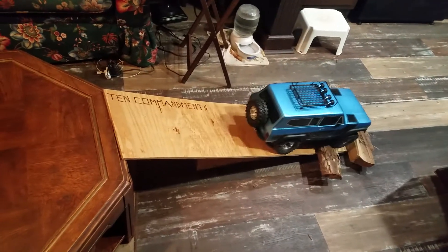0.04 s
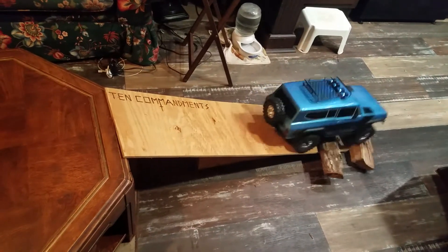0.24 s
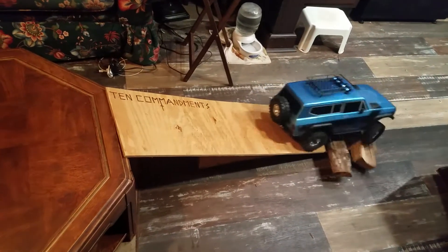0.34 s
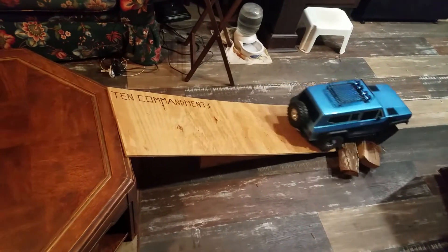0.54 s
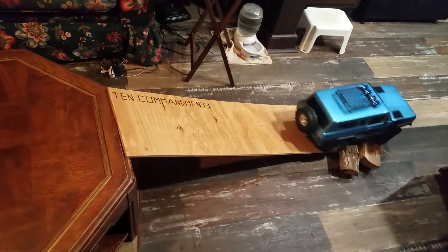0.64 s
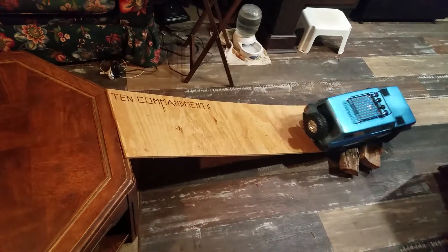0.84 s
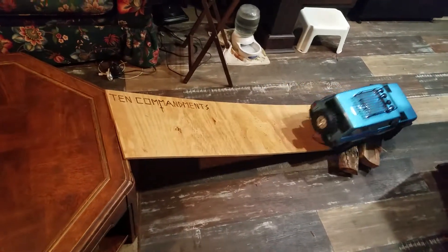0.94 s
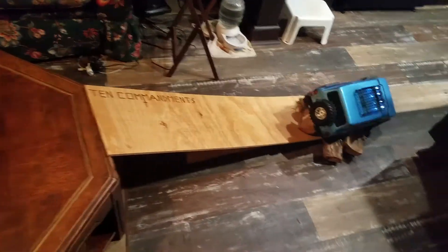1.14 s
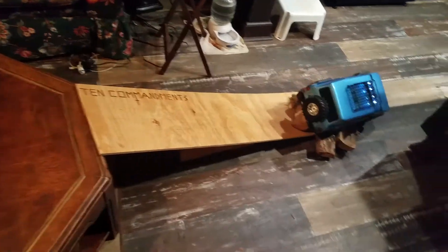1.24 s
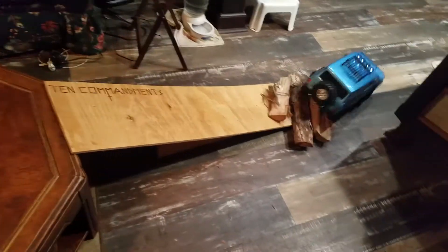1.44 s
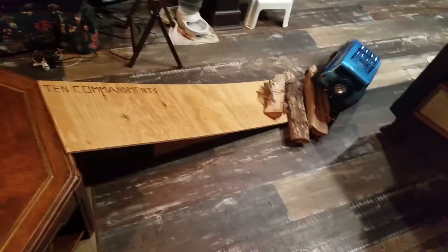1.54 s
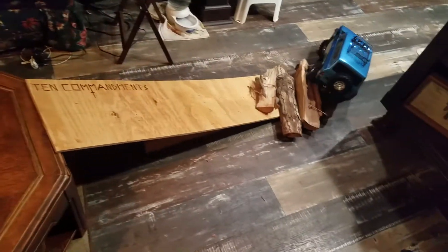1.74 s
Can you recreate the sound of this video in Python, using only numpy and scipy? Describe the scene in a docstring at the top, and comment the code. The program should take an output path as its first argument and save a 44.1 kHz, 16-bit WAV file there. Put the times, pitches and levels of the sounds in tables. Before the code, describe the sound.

Close by in a room, a toy truck's geared motor whirs as its tires land on wood with hollow thumps. It eases off, squeaks twice, then revs again amid more knocks and plastic rattles.

```python
"""A geared motor rasps and whines in bursts of throttle over the rumble of tires on wood: a small
remote-controlled truck crawling off a plywood ramp and over split logs, on a living room floor.
Landing tires boom and ring the wood, the chassis knocks on a log, the plastic shell clacks and
rattles, and two brief squeaks slip out. The stereo microphone is near the truck, with the treble
a little to the left; the room answers every blow with a short tail."""
import sys
import numpy as np
from scipy import signal
from scipy.fft import rfft, irfft, next_fast_len
from scipy.io import wavfile
from scipy.ndimage import map_coordinates

SR = 44100
rng = np.random.default_rng(int(sys.argv[2]) if len(sys.argv) > 2 else 0)


def transcribe(signal):
    """Save signal, clipped to [-1, 1], as a 16-bit WAV file at the path in sys.argv[1]."""
    frames = np.atleast_2d(signal).T
    limited = np.clip(frames, -1, 1)
    pcm = np.round(limited * 32767).astype(np.int16)
    wavfile.write(sys.argv[1], SR, pcm)


N = 79380

# gear rasp following the throttle: time_s, level_db
THROTTLE = [(0, -45.5), (.03, -37.5), (.26, -35.5), (.5, -35), (.6, -50), (.695, -54), (.755, -33.5),
            (.79, -32), (.92, -54), (1.0, -42.5), (1.07, -45), (1.158, -57), (1.215, -33), (1.31, -28.5),
            (1.45, -36.5), (1.6, -44.5), (1.66, -42), (1.8, -39)]
# gear mesh following motor speed: time_s, pitch_hz
MESH_PITCH = [(0, 3700), (.09, 4300), (.22, 4950), (.45, 4950), (.53, 4400), (.67, 800), (.92, 1400),
              (.99, 2700), (1.04, 2950), (1.075, 2450), (1.16, 2350), (1.205, 4150), (1.275, 5500),
              (1.31, 5400), (1.34, 4650), (1.5, 3400)]
# gear whine, strongest as the motor revs: time_s, level_db
WHINE_LEVEL = [(0, -46), (.14, -43), (.5, -46.5), (.92, -72), (1.0, -42.5), (1.1, -48), (1.17, -61),
               (1.23, -32), (1.34, -35.5), (1.4, -53)]
# tones of the gear stages: cycles_per_motor_turn, level_db
GEAR_ORDERS = [(9.6, -6), (14, 0), (21, -5)]
# spectrum of the gear rasp: frequency_hz, level_db
GEAR_SPECTRUM = [(100, -28), (420, 2.5), (1600, -3.5), (3300, -1.5), (4700, 0.5), (5800, -5.5), (7400, -2),
                 (8300, -5.5), (9200, -13.5), (15500, -40)]
# bright fizz of the gears and of the shell's snap: frequency_hz, level_db
FIZZ_SPECTRUM = [(1500, -58), (5000, 6), (9500, 2), (15000, 1.5)]
# tires rolling on wood: time_s, level_db
ROLL_LEVEL = [(0, -44.5), (.11, -38.5), (.14, -33.5), (.3, -25), (.44, -33), (.6, -40), (.7, -43),
              (.95, -43), (1.14, -52), (1.29, -34), (1.42, -27.5), (1.51, -29), (1.61, -38.5), (1.7, -31),
              (1.8, -38)]
# spectrum of tread on wood: frequency_hz, level_db
TREAD_SPECTRUM = [(20, -70), (50, -4.5), (180, -1.5), (300, -4), (400, -3), (500, -9.5), (700, -10.5),
                  (1400, -12.5), (2200, -17), (5000, -35)]
# tires landing: start_s, level_db, pitch_hz
LANDINGS = [(0.129, -19.5, 202), (0.199, -21, 170), (0.251, -17, 181), (.312, -10, 232), (.323, -2, 211),
            (.345, -8, 284.4), (0.37, -13.5, 252), (.397, -34, 204), (0.429, -16, 163), (.488, -17.5, 190),
            (0.807, -20, 312), (0.822, -18, 187), (0.832, -15, 420), (1.309, -15, 226), (1.318, -12.5, 167),
            (1.332, -15.5, 422), (1.348, -18, 258), (1.378, -11.5, 424), (1.693, -25.5, 414)]
# modes of the ramp and logs: pitch_hz, level_db, t60_s
WOOD_MODES = [(83.3, 3, 0.39), (151, 3, 0.253), (180.5, -2.5, 0.18), (253.5, -2, 0.15), (357, -1, 0.2),
              (422.3, -4.5, 0.1), (579, -1.5, 0.31)]
# chassis striking a log: start_s, level_db
CHASSIS_HITS = [(.262, -24.5), (.312, -19.5), (1.378, -25)]
# modes rung by the chassis: pitch_hz, level_db, t60_s
CHASSIS_HIT_MODES = [(937, -10, 0.085), (1298, -3.5, 0.14), (1370, -13, 0.023)]
# blows to the plastic shell: start_s, level_db, tilt_db_per_octave
SHELL_HITS = [(.135, -28.5, -2), (.526, -25.5, -6.5), (.622, -33.5, -5), (0.82, -23, 0), (1.33, -22, -4),
              (1.529, -24, 0), (1.627, -35, 3), (1.639, -27.5, -3), (1.758, -27.5, -5.5)]
# spectrum of the shell: frequency_hz, level_db
SHELL_SPECTRUM = [(100, -26), (400, 1), (950, -0.5), (1350, 2), (1900, -4), (2350, 0.5), (3500, -6.5),
                  (5000, -14), (15000, -36)]
# gears and tires squeaking under load: centre_s, length_s, pitch_hz, glide_octaves_per_s, level_db
LOAD_SQUEAKS = [(.728, .04, 1070, 9, -41), (.772, .035, 6080, .3, -34.5)]
# room tone: frequency_hz, level_db
ROOM_TONE_SPECTRUM = [(20, 6), (60, 9.5), (400, -17.5), (15000, -34)]
# reverberation of the living room: frequency_hz, t60_s
ROOM_DECAY = [(100, 0.19), (500, 0.42), (3000, 0.34), (12000, 0.099)]
# likeness of left and right at the microphone: frequency_hz, correlation
MIC_CORRELATION = [(60, 1), (250, 0.96), (500, 0.82), (1000, 0.64), (2000, -0.13)]
# balance at the microphone: frequency_hz, left_minus_right_db
MIC_BALANCE = [(50, -2.5), (400, -0.6), (2200, 1), (5000, 2), (7500, 6.5), (11000, -1.5)]

CRUISE_DB, PINION_TEETH = -39, 14  # effort is counted from the mid-throttle level
RASP_DB, FIZZ_DB, FIZZ_DB_PER_EFFORT_DB, FIZZ_DB_PER_OCTAVE = 1.5, -3.5, 1.32, 3
THUMP_RISE_S, RING_DB, RING_FALL_DB_PER_OCTAVE = 0.0035, -11.5, 8.5
CLACK_T60_S, RATTLE_T60_S, RATTLE_DB, SNAP_DB = 0.066, 0.25, -11, -12
LOW_CUT_HZ, TOP_HZ = 37, 15870


def drivetrain():
    """Gear teeth rasp once a motor turn and each gear stage whines; more throttle is brighter."""
    effort_db = curve(THROTTLE) - CRUISE_DB
    turn_hz = curve(MESH_PITCH) / PINION_TEETH
    phase = 2 * np.pi * np.cumsum(turn_hz * (1 + 0.012 * wobble(60))) / SR
    teeth = amp(0.8 * np.sin(phase) + wobble(900))
    rasp = amp(RASP_DB + effort_db) * noise(GEAR_SPECTRUM, teeth)
    speed_db = FIZZ_DB_PER_OCTAVE * np.log2(turn_hz / turn_hz.mean())
    fizz = amp(FIZZ_DB + FIZZ_DB_PER_EFFORT_DB * effort_db + speed_db) * noise(FIZZ_SPECTRUM, teeth)
    partials = np.zeros(N)
    for order, db in GEAR_ORDERS:
        swell_db = 4.5 * wobble(45)
        gain = amp(db + along(GEAR_SPECTRUM, order * turn_hz) + swell_db)
        partials += gain * np.sin(order * phase + 0.65 * wobble(500))
    whine = amp(curve(WHINE_LEVEL)) * unit(in_room(unit(partials), wet_db=1))
    return amp(CRUISE_DB) * (rasp + fizz) + whine


def rolling_tires():
    """Tread blocks patter unevenly over the wood."""
    patter = amp(1.68 * wobble(110))
    return amp(2 + curve(ROLL_LEVEL)) * noise(TREAD_SPECTRUM, patter)


def tire_thumps():
    """Each landing is a short hollow boom that rings the wood, most in the modes near its own pitch."""
    out, t = np.zeros((2, N)), np.arange(SR // 2) / SR
    rise = t / THUMP_RISE_S
    for start_s, db, pitch_hz in LANDINGS:
        boom = np.sin(2 * np.pi * pitch_hz * t) * rise * np.exp(1 - rise)
        ring = np.zeros(len(t))
        for hz, mode_db, t60_s in WOOD_MODES:
            octaves_off = abs(np.log2(hz / pitch_hz))
            gain = amp(mode_db + rng.normal(0, 2.04) - RING_FALL_DB_PER_OCTAVE * octaves_off)
            ring += gain * np.sin(2 * np.pi * (hz * t + rng.random())) * fade(t, t60_s)
        thump = boom + amp(RING_DB) * ring * (1 - np.exp(-rise))
        add(out, start_s, amp(db) * in_room(thump, wet_db=-4.5))
    return out


def chassis_knocks():
    """The chassis hits a log: a sharp crack and a short woody ring."""
    out, t = np.zeros((2, N)), np.arange(SR // 2) / SR
    for start_s, db in CHASSIS_HITS:
        ring = sum(amp(mode_db) * np.sin(2 * np.pi * hz * t) * fade(t, t60_s)
                   for hz, mode_db, t60_s in CHASSIS_HIT_MODES)
        crack = amp(1) * noise(TREAD_SPECTRUM)[:, :len(t)] * fade(t, t60_s=0.016)
        add(out, start_s, amp(db) * in_room(ring + crack, wet_db=-4.5))
    return out


def shell_clacks():
    """The thin body shell snaps sharply, then chatters on its posts."""
    out, t = np.zeros((2, N)), np.arange(SR // 2) / SR
    strike = fade(t, CLACK_T60_S)
    for start_s, db, tilt in SHELL_HITS:
        colour = [(hz, level_db + tilt * np.log2(hz / 1300)) for hz, level_db in SHELL_SPECTRUM]
        chatter = amp(RATTLE_DB + 3.76 * wobble(264)[:len(t)]) * fade(t, RATTLE_T60_S)
        snap = amp(SNAP_DB + 4.2 * tilt) * noise(FIZZ_SPECTRUM)[:, :len(t)] * strike
        body = noise(colour)[:, :len(t)] * (strike + chatter)
        add(out, start_s, amp(db) * in_room(snap + body, wet_db=-1.5))
    return out


def squeaks():
    """Gears and tires under load give short, rough, rising chirps."""
    out = np.zeros(N)
    for centre_s, length_s, hz, glide, db in LOAD_SQUEAKS:
        t = np.arange(N) / SR - centre_s
        phase = 2 * np.pi * np.cumsum(hz * 2 ** (glide * t)) / SR
        swell = np.exp(-(2 * t / length_s) ** 2)
        out += amp(db + 0.5) * swell * np.sin(phase + 0.92 * wobble(hz / 8))
    return in_room(out, wet_db=1.5)


def in_room(x, wet_db):
    """The direct sound plus the living room's stereo tail, which dies fastest in the treble."""
    hz, t, bands = signal.stft(rng.standard_normal((2, SR // 2)), SR, nperseg=256)
    bands = bands * fade(t, along(ROOM_DECAY, hz)[:, None])
    tail = spread(signal.istft(bands, SR, nperseg=256)[1])
    wet = signal.fftconvolve(np.atleast_2d(x), tail / np.linalg.norm(tail[0]), axes=1)
    return x + amp(wet_db) * wet[:, :x.shape[-1]]


def room_tone():
    """The faint, steady rumble of the room behind the truck."""
    return amp(-48.5) * noise(ROOM_TONE_SPECTRUM)


def amp(db):
    """Decibels to gain."""
    return 10 ** (np.asarray(db) / 20)


def unit(x):
    """Scale to rms 1."""
    return x / np.sqrt(np.mean(x ** 2) + 1e-20)


def fade(t, t60_s):
    """A decay of 60 dB in t60_s seconds."""
    return amp(-60 * t / t60_s)


def along(rows, hz):
    """Read (frequency_hz, value) rows on a log axis."""
    row_hz, values = np.transpose(rows)
    return np.interp(np.log(hz + 1), np.log(row_hz + 1), values)


def curve(rows):
    """One value per sample from (time_s, value) rows."""
    return np.interp(np.arange(N) / SR, *np.transpose(rows))


def wobble(knots_per_s):
    """A smooth random curve."""
    return map_coordinates(rng.standard_normal(N // 8), [np.arange(N) * knots_per_s / SR], mode="wrap")


def filtered(x, response):
    """Filter x by response(hz), a gain at each frequency."""
    n = x.shape[-1]
    padded = next_fast_len(n + SR // 4)
    return irfft(rfft(x, padded) * response(np.fft.rfftfreq(padded, 1 / SR)), padded)[..., :n]


def spread(pair):
    """Two unrelated signals to left and right: alike in the bass, apart in the treble."""
    def mid_side_gains(hz):
        angle = np.arccos(np.clip(along(MIC_CORRELATION, hz), -1, 1)) / 2
        return np.array([np.cos(angle), np.sin(angle)])
    mid, side = filtered(pair, mid_side_gains)
    return np.array([mid + side, mid - side])


def noise(spectrum, grain=1):
    """Stereo noise of rms 1, roughened by grain and then coloured."""
    rough = grain * rng.standard_normal((2, N))
    return unit(spread(filtered(rough, lambda hz: amp(along(spectrum, hz)))))


def add(track, start_s, x):
    """Mix x into the track at start_s."""
    part = track[:, max(round(start_s * SR), 0):][:, :x.shape[-1]]
    part += x[:, :part.shape[1]]


def scene():
    """At the microphone: the truck over the room tone, the treble a little to the left."""
    truck = drivetrain() + squeaks() + rolling_tires() + tire_thumps() + chassis_knocks() + shell_clacks()
    return filtered(truck + room_tone(), lambda hz: amp(np.outer([.5, -.5], along(MIC_BALANCE, hz))))


def record(dry):
    """The recorder sheds the deep bass and keeps nothing above its band limit."""
    return filtered(dry, lambda hz: (hz < TOP_HZ) * (1 - np.exp(-(hz / LOW_CUT_HZ) ** 3)))


dry = scene()
out = record(dry)
transcribe(out)
```